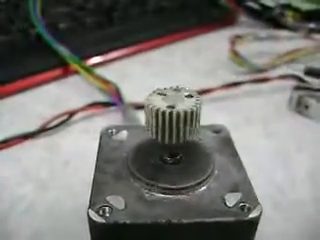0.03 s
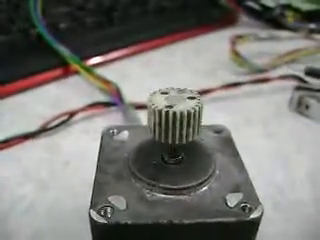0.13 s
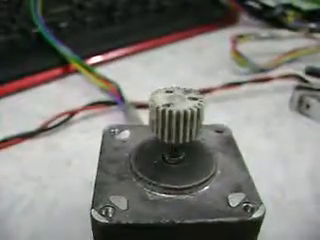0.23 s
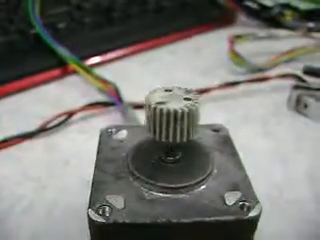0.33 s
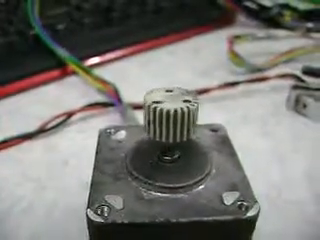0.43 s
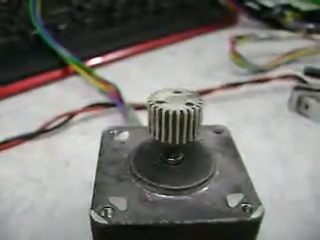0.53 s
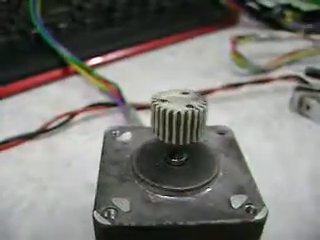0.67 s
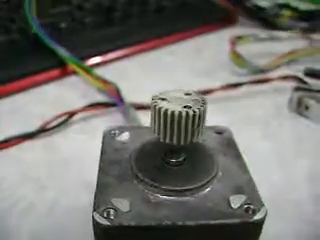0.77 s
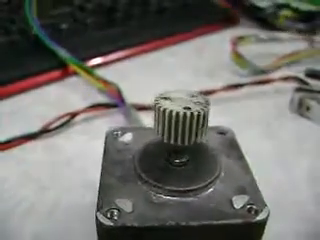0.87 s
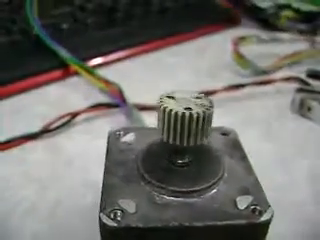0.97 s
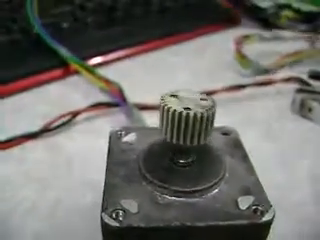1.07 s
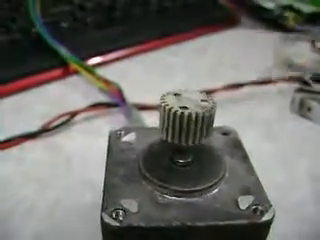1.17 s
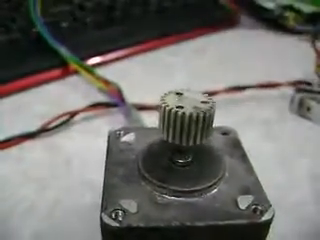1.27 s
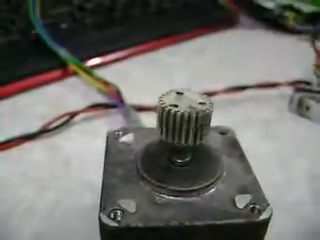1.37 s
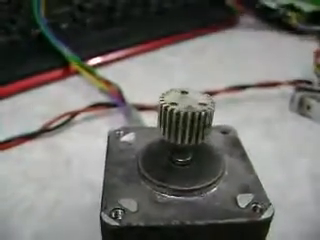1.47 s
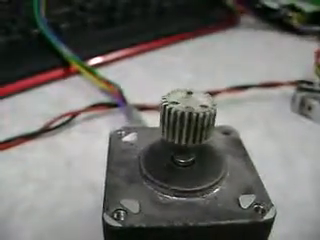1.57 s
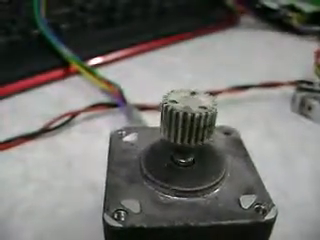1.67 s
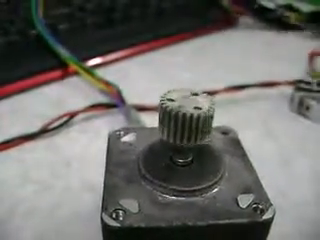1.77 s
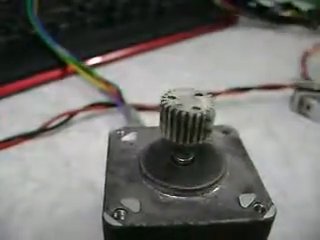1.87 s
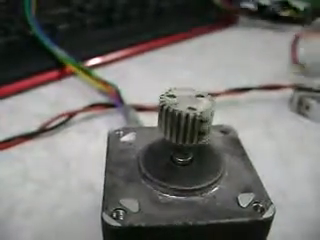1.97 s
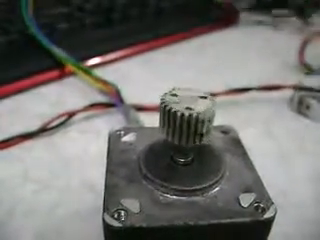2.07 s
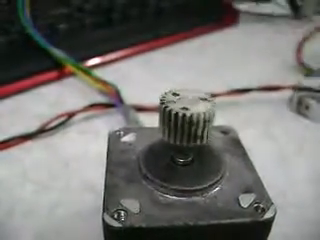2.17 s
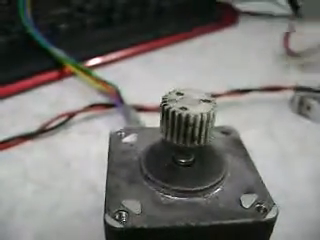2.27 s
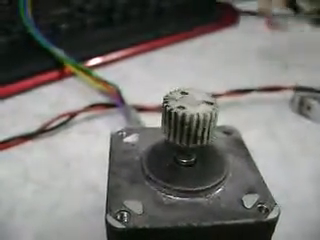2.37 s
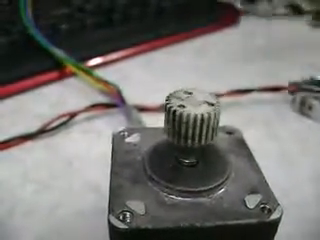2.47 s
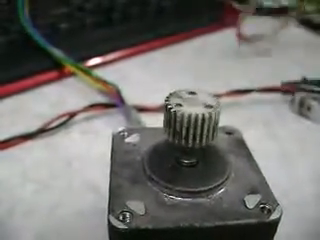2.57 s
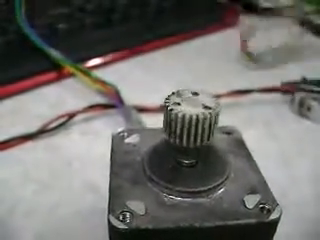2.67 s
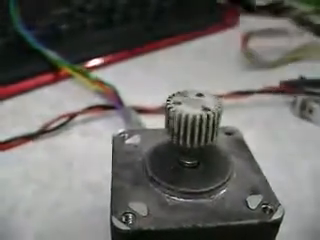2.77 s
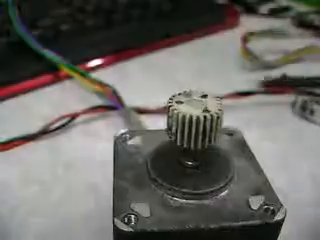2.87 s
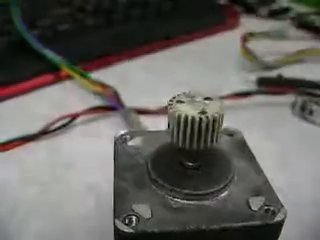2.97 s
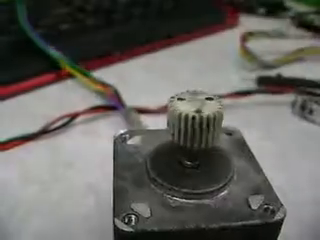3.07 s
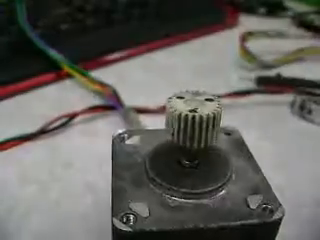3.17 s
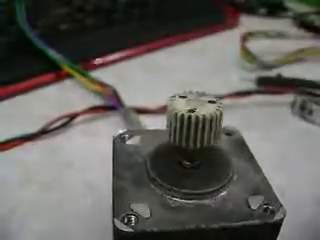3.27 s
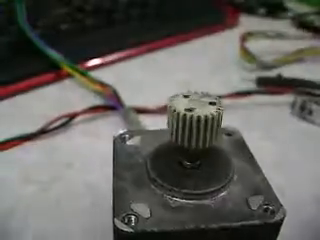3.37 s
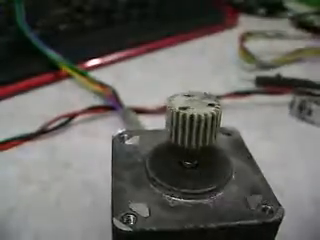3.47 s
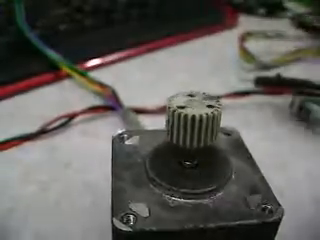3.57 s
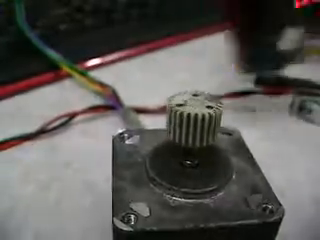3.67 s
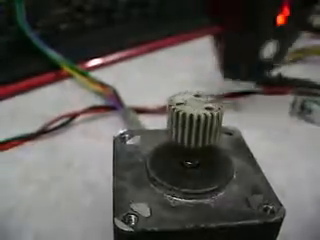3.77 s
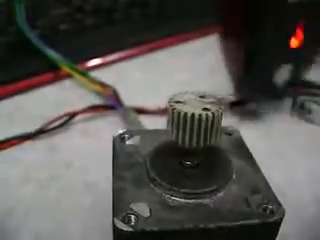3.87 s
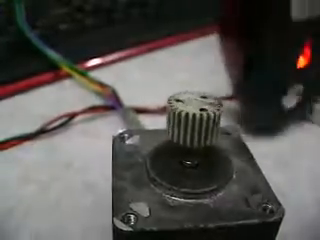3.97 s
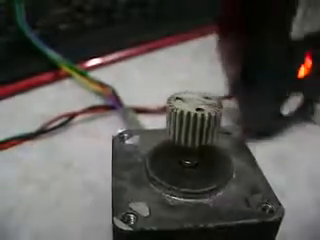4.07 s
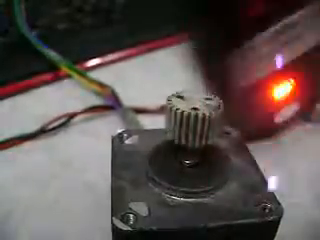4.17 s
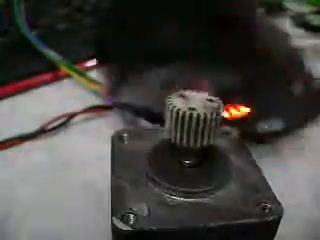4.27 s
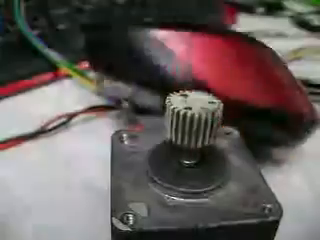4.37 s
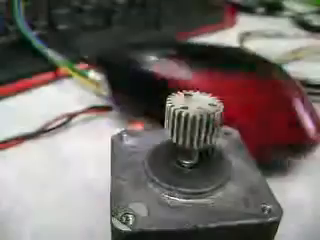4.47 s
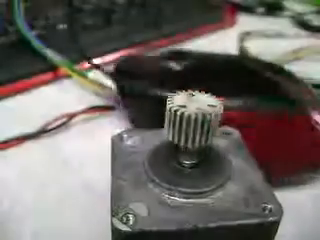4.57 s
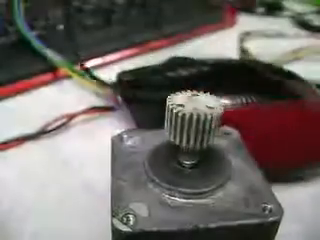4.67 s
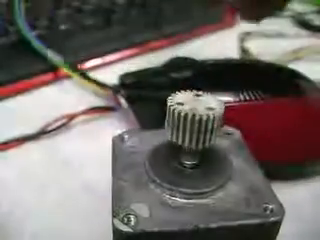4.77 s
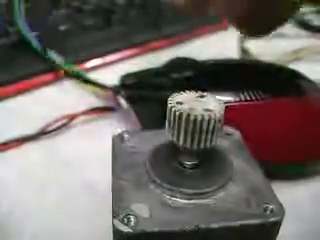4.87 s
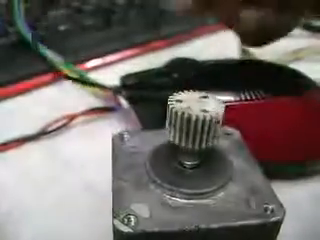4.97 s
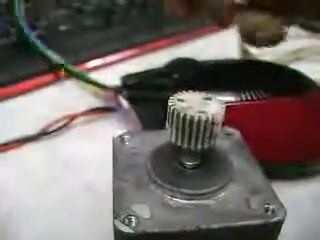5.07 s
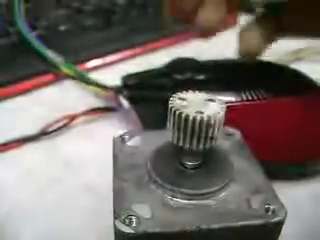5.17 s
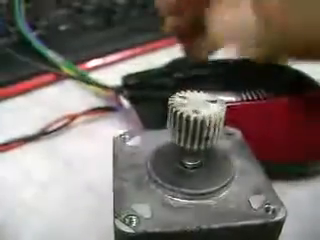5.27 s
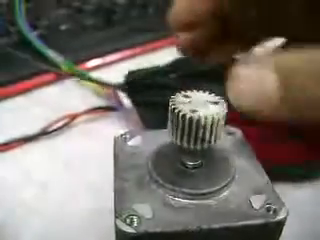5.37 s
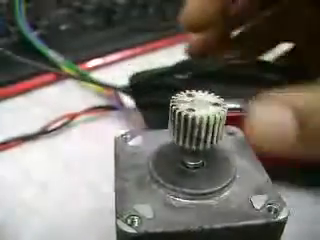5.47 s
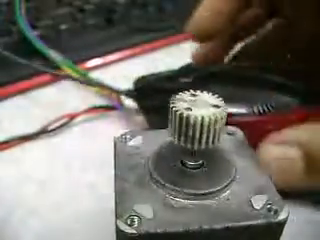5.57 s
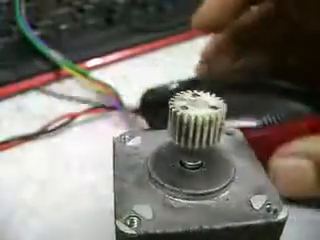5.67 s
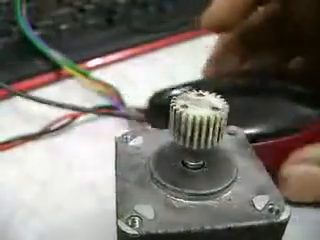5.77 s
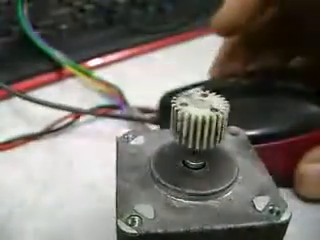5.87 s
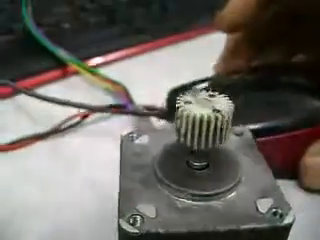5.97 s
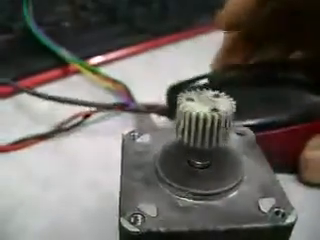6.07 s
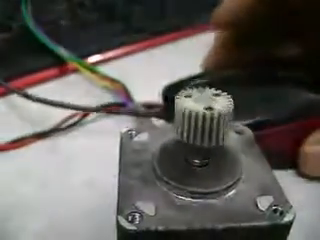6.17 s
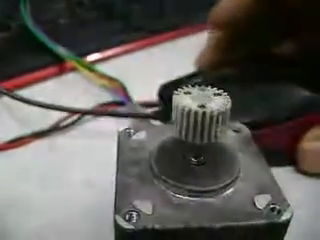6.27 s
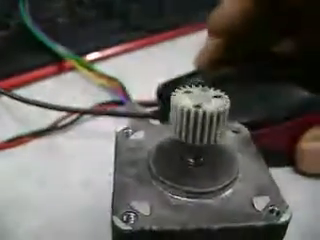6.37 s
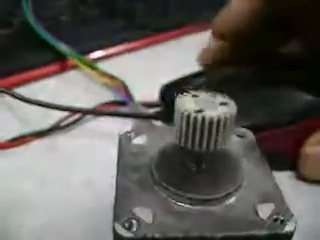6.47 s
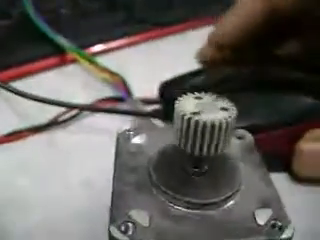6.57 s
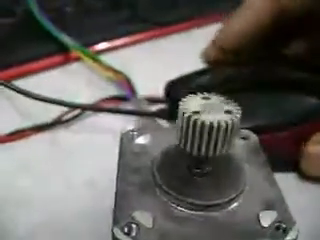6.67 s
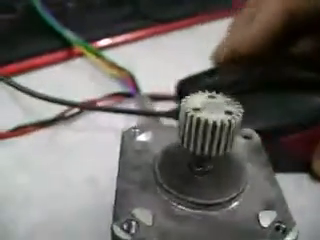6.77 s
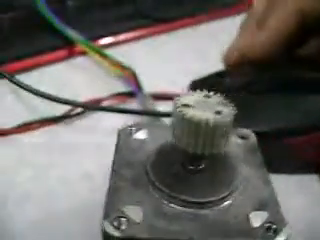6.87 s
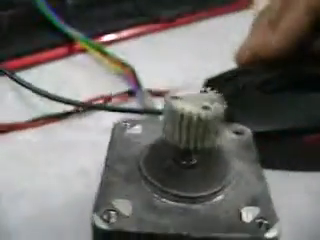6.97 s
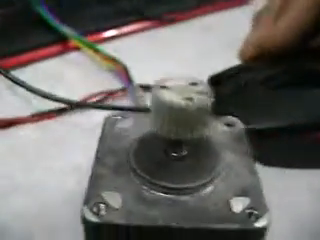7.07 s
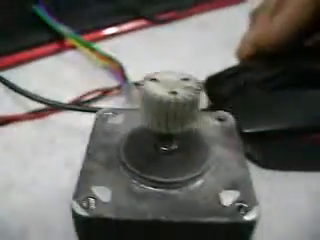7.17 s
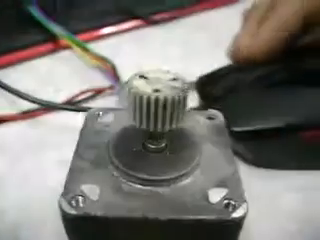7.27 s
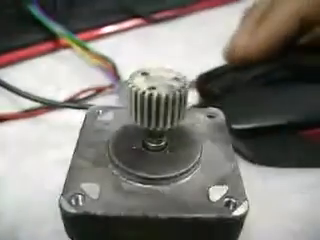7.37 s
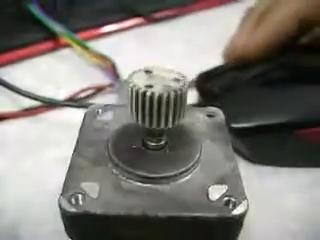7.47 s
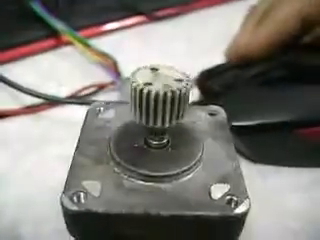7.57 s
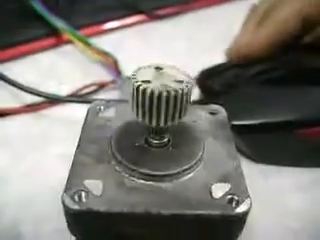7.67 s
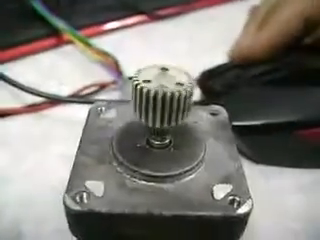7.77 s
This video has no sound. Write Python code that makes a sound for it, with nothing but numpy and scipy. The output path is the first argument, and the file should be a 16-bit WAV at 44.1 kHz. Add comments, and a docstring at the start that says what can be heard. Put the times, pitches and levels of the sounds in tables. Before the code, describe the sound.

Close on a desktop, an even fan noise drones throughout. Things are pushed with short scrapes, plastic connectors tumble in sharp irregular clicks, and a mouse is knocked and set down hard. Soft sliding, a few faint ticks and two short squeaks follow before only gentle rubbing and hiss remain. The sound is band-limited, with clipped peaks and slight room ring.

```python
"""A steady fan rush with hiss, soon joined by scrapes and dull rubs of things pushed over a desk.
Plastic plugs clatter and shake loose leads; a computer mouse is knocked, set down and slid, squeaking faintly.
Blows are cracks, pings and ringing modes; slides and fan are shaped noise; the squeak is gliding tones.
A close, narrow-band microphone clips whatever exceeds its limits."""
import sys
import numpy as np
from scipy import signal
from scipy.fft import rfft, irfft, next_fast_len
from scipy.io import wavfile

SR = 44100
rng = np.random.default_rng(int(sys.argv[2]) if len(sys.argv) > 2 else 0)


def waveform_to_disk(signal):
    """Save audio, clipped to [-1, 1], as 16-bit WAV at the path in sys.argv[1]."""
    frames = np.transpose(np.atleast_2d(signal))
    scaled = np.clip(frames, -1, 1) * 32767
    samples = np.round(scaled).astype(np.int16)
    wavfile.write(sys.argv[1], SR, samples)


N = 344914
TIME_S = np.arange(N) / SR

# plug blows, relative levels: (time [s], struck part pitch [Hz], edge crack [dB], shell knock [dB], desk thud [dB])
PLUG_BLOWS = [(2.3254, 1240, -5, -22.5, -29), (2.3529, 1430, -12, -10, -30), (2.4127, 1150, -7, -18.5, -32),
              (2.497, 3400, -3, -26, -14), (2.504, 1070, -29, -23, -15.5), (2.5165, 2620, -9.5, -46, -36),
              (2.5399, 1710, -10.5, -38, -39), (2.5682, 2600, 0.5, -18.5, -21),
              (2.5932, 2700, -12.5, -35, -33), (2.6271, 1480, -12, -16.5, -49),
              (2.6351, 2150, -3, -20.5, -44), (2.657, 3220, -9.5, -52, -45), (2.683, 970, -11, -7, -13.5),
              (2.7035, 2110, -9, -33, -23.5), (2.7282, 980, -9.5, -21.5, -29), (2.736, 2230, -16, -40, -25),
              (2.8363, 1500, -12.5, -31, -40), (2.85, 1810, -12, -31, -50.5), (2.939, 1000, -25, -27, -40),
              (3.034, 5020, -14.5, -36, -44)]
# mouse on desk, relative levels: (time [s], struck part pitch [Hz], edge crack [dB], shell knock [dB], desk thud [dB])
MOUSE_BLOWS = [(3.9425, 1380, -15, -45, -42), (4.0528, 1150, -0.5, -19, -33),
               (4.0565, 1000, -18, -12.5, -26), (4.0835, 970, -16, -19.5, -26),
               (4.1096, 1020, -20, -21, -30), (4.4617, 920, 4.5, -6.5, -16.5),
               (4.4725, 1080, -11, -16, -34), (4.4803, 940, -11, -16.5, -24), (4.4905, 980, -26, -26, -24),
               (4.5742, 1880, -1.3, -20, -28), (4.675, 1190, -21, -33, -49), (5.941, 1050, -15, -24.5, -50),
               (5.951, 1080, -29, -33, -47), (6.07, 1410, -28, -33, -43), (6.226, 1860, -17, -34, -62)]
# body modes of plug on desk top: (frequency [Hz], relative level [dB], t60 [s])
PLUG_BODY_MODES = [(60, -13.5, 0.006), (330, -4.5, 0.029), (508, -3, 0.14), (895, 1, 0.015),
                   (1083, -1.5, 0.041), (1500, 2, 0.0076), (1900, -2, 0.009), (2500, 2, 0.0054),
                   (3080, -2.5, 0.0042), (3700, -10.5, 0.014), (4420, -2.5, 0.011), (4900, -4, 0.005),
                   (6100, 0.5, 0.0053)]
# body modes of mouse on desk top: (frequency [Hz], relative level [dB], t60 [s])
MOUSE_BODY_MODES = [(45, 2.5, 0.0047), (169, -16, 0.014), (234, -7.5, 0.024), (390, 4.5, 0.024),
                    (462, -0.5, 0.064), (631, -2.5, 0.12), (760, -9.5, 0.016), (973, 4.5, 0.01),
                    (1089, -0.5, 0.02), (1570, -10, 0.0043), (1900, -17.5, 0.013), (2510, -27, 0.002),
                    (3700, -6, 0.01), (4680, -6.5, 0.0042), (6100, -2.5, 0.016)]
# hollow desk boom under the first mouse knocks: (peak time [s], rise [s], fall [s], level [dB])
DESK_BOOM = (4.135, .075, .05, -36)
# things pushed over the desk: (time of top speed [s], rise [s], fall [s], scrape level [dB], dull rub level [dB])
PUSHES = [(.575, .04, 0.042, -38.5, -31), (.655, 0.019, 0.028, -30, -32), (2.13, 0.13, 0.33, -38.5, -46.5),
          (2.53, 0.092, 0.14, -45, -32.5), (2.69, 0.032, 0.1, -29.5, -34), (2.88, 0.068, 0.63, -39, -43),
          (3.97, 0.11, 0.17, -42.5, -35), (4.62, 0.024, 0.16, -37, -33.5), (5.6, 0.38, 0.43, -42.5, -37.5),
          (6.05, 0.081, .04, -39.5, -39.5), (6.24, 0.041, 0.44, -42, -41.5), (6.95, 0.12, 0.13, -37, -50),
          (7.3, 0.27, 0.51, -49, -40)]
# scrape spectrum: (frequency [Hz], relative density [dB per Hz])
SCRAPE_SPECTRUM = [(100, -26.5), (400, -16), (700, 0), (1100, 4), (1500, -5), (2200, -7.5), (3200, -10.5),
                   (5200, -14.5)]
# soft, dull rub spectrum: (frequency [Hz], relative density [dB per Hz])
RUB_SPECTRUM = [(40, -30), (200, -5), (450, -3), (650, 0), (950, -6.5), (1400, -21.5), (4000, -37.5)]
# mouse foot squeaks: (peak time [s], rise [s], fall [s], pitch at peak [Hz], glide [Hz per s], relative level [dB])
SQUEAK_GLIDES = [(6.838, .012, .08, 1560, -3000, -34), (6.953, .022, .022, 1330, 4800, -26.5)]
# fan and microphone hiss spectrum: (frequency [Hz], relative density [dB per Hz])
FAN_SPECTRUM = [(25, -15), (48, -17.5), (90, -11.5), (200, -6.5), (370, 1.5), (510, -3), (740, 0),
                (1000, -5), (1300, -6.5), (1640, -13), (1850, -9), (2500, -15), (2950, -19), (5200, -22.5)]
# droning fan resonances: (frequency [Hz], width [Hz], level [dB])
FAN_DRONES = [(173.7, 7.1, -52), (236.4, 7.6, -48.5), (361, 59, -48.5), (842, 170, -41.5)]

ROOM_T60_S, REFLECTION_RISE_S = 0.4, 0.0017
RATTLE_TAPS_PER_S, RATTLE_DB, RATTLE_T60_S = 370, -13.5, 0.3  # RATTLE_DB: re the crack
FAN_DB, FAN_WANDER_DB = -33, 0.62
MIC_LIMIT, CEILING = 0.88, 0.63  # amplitude
MIC_EDGE_HZ, MIC_STEEP_EDGE_HZ, CUTOFF_HZ = 5337, 6750, 16000


def from_db(db):
    """Decibels to amplitude gain."""
    return 10 ** (np.asarray(db) / 20)


def rms_one(x):
    """Scale to rms 1."""
    return x / np.sqrt(np.mean(x ** 2) + 1e-20)


def unit_energy(x):
    """Scale to energy 1."""
    return x / np.sqrt(np.sum(x ** 2) + 1e-20)


def coloured_noise(spectrum):
    """Noise shaped by a spectrum, flat beyond its ends; rms 1."""
    hz, db = np.transpose(spectrum)
    size = next_fast_len(N)
    grid_hz = np.maximum(np.fft.rfftfreq(size, 1 / SR), 1)
    gain = from_db(np.interp(np.log(grid_hz), np.log(hz), db))
    return rms_one(irfft(rfft(rng.standard_normal(size)) * gain, size)[:N])


def drift(cutoff_hz):
    """Low-passed random fluctuation; rms 1."""
    lowpass = signal.butter(2, cutoff_hz, fs=SR, output="sos")
    slow = signal.sosfilt(lowpass, rng.standard_normal(N + SR))
    return rms_one(slow[SR:])  # drop the filter's start-up


def swell(peak_s, rise_s, fall_s):
    """Speed of a movement: Gaussian rise and fall, height 1."""
    side_s = np.where(TIME_S < peak_s, rise_s, fall_s)
    return np.exp(-np.minimum(((TIME_S - peak_s) / side_s) ** 2, 20))


def mode_width_hz(t60_s):
    """Resonance bandwidth that decays 60 dB in t60_s."""
    return np.log(1000) / (np.pi * t60_s)


def resonate(x, hz, width_hz):
    """Two-pole resonance, gain about 1 at its centre."""
    r = np.exp(-np.pi * width_hz / SR)
    numerator = np.array([1, 0, -1]) * (1 - r * r) / 2
    denominator = [1, -2 * r * np.cos(2 * np.pi * hz / SR), r * r]
    return signal.lfilter(numerator, denominator, x + 1e-18)


def ring_mode(t_s, hz, t60_s, sign, scatter_db, scatter_t60_s, room_db):
    """One body mode rings directly, through nearby scatter and in the room tail; energy 1."""
    width_hz = mode_width_hz(t60_s)
    arrived = np.clip(t_s / REFLECTION_RISE_S, 0, 1) ** 2
    near, far = rng.standard_normal((2, len(t_s))) * arrived
    direct = unit_energy(resonate(1. * (t_s == 0), hz, width_hz)) * sign
    scatter = unit_energy(resonate(near * from_db(-60 * t_s / scatter_t60_s), hz, width_hz))
    tail = unit_energy(resonate(far * from_db(-60 * t_s / ROOM_T60_S), hz, width_hz))
    return unit_energy(direct + from_db(scatter_db) * scatter + from_db(room_db) * tail)


def contacts(blows, modes, level_db, clack_db, tick_db, scatter_db, scatter_t60_s, room_db,
             crack_db, crack_hz, ping_db, ping_t60_s):
    """Each blow cracks, pings the struck part and rings the body; upper modes (clack, tick) follow the crack."""
    out = np.zeros(N + SR)
    t_s = np.arange(SR // 2) / SR
    band_hz = [400, 1000, 2100, 4300]  # thud, knock, clack, tick
    crack = np.sin(2 * np.pi * crack_hz * t_s) * np.exp(-t_s * crack_hz)  # hard edges: little over one cycle
    for time_s, part_hz, peak_db, knock_db, thud_db in blows:
        band_db = [thud_db, knock_db, peak_db + clack_db, peak_db + tick_db]
        ping = np.sin(2 * np.pi * part_hz * t_s) * from_db(ping_db - 60 * t_s / ping_t60_s)
        blow = from_db(peak_db) * (from_db(crack_db) * crack + ping)
        for k, (hz, mode_db, t60_s) in enumerate(modes):
            ring = ring_mode(t_s, hz, t60_s, (-1) ** k, scatter_db, scatter_t60_s, room_db)
            drive_db = np.interp(np.log(hz), np.log(band_hz), band_db)
            blow = blow + ring * from_db(level_db + mode_db + drive_db)
        start = round(time_s * SR)
        out[start:start + len(t_s)] += blow
    return out[:N]


def plug_clatter():
    """Plastic plugs strike with hard cracks and ringing shells."""
    return contacts(PLUG_BLOWS, PLUG_BODY_MODES, level_db=22.5, clack_db=-15.5, tick_db=-19.5,
                    scatter_db=-3.5, scatter_t60_s=0.056, room_db=-6.5,
                    crack_db=0, crack_hz=2700, ping_db=-7.5, ping_t60_s=0.015)


def mouse_knocks():
    """The mouse meets the desk; its upper body modes are driven less than the plugs'."""
    return contacts(MOUSE_BLOWS, MOUSE_BODY_MODES, level_db=23.0, clack_db=-28, tick_db=-22,
                    scatter_db=-2, scatter_t60_s=0.06, room_db=-10,
                    crack_db=1, crack_hz=2750, ping_db=-9.5, ping_t60_s=0.016)


def lead_rattle():
    """Plug blows shake the leads: random taps die away, each waking one upper plastic mode."""
    decays = [(TIME_S > time_s) * from_db(crack_db - 60 * np.abs(TIME_S - time_s) / RATTLE_T60_S)
              for time_s, _, crack_db, *_ in PLUG_BLOWS]
    shaken = np.max(decays, axis=0)
    modes = [mode for mode in PLUG_BODY_MODES if mode[0] > 800]
    tapped = rng.random(N) < RATTLE_TAPS_PER_S / SR
    taps = tapped * rng.uniform(-1.1, 1, N) * from_db(RATTLE_DB) * shaken
    mode_of_tap = rng.integers(0, len(modes), N)
    out = np.zeros(N)
    for k, (hz, _, t60_s) in enumerate(modes):
        width_hz = mode_width_hz(t60_s)
        unit_height = SR / (2 * np.pi * width_hz)  # a unit tap rings with height about 1
        out += resonate(taps * (mode_of_tap == k), hz, width_hz) * unit_height
    return out


def desk_boom(hz):
    """The desk top swings at its lowest note."""
    peak_s, rise_s, fall_s, db = DESK_BOOM
    return from_db(db) * swell(peak_s, rise_s, fall_s) * np.sin(2 * np.pi * hz * TIME_S)


def sliding(grain_db):
    """Pushes scrape with a fine, uneven grain and stir the desk's low and middle notes."""
    scrape_gain, rub_gain = 0, 0
    for peak_s, rise_s, fall_s, scrape_db, rub_db in PUSHES:
        speed = swell(peak_s, rise_s, fall_s)
        scrape_gain = scrape_gain + from_db(scrape_db) * speed
        rub_gain = rub_gain + from_db(rub_db) * speed
    grain = from_db(grain_db * drift(170))
    scrape = scrape_gain * grain * coloured_noise(SCRAPE_SPECTRUM)
    return scrape + rub_gain * coloured_noise(RUB_SPECTRUM)


def squeak(rough_db, overtone_db, scrape_db, scrape_hz):
    """The mouse foot sticks and slips in short, unsteady glides with a bright scrape."""
    unsteady = 1 + 0.018 * drift(200)  # pitch factor
    highpass = signal.butter(2, scrape_hz, "high", fs=SR, output="sos")
    scrape = rms_one(signal.sosfilt(highpass, rng.standard_normal(N)))
    out = 0
    for peak_s, rise_s, fall_s, hz, glide_hz_per_s, db in SQUEAK_GLIDES:
        pitch_hz = (hz + glide_hz_per_s * (TIME_S - peak_s)) * unsteady
        phase = 2 * np.pi * np.cumsum(pitch_hz) / SR
        tones = np.sin(phase) + from_db(overtone_db) * np.sin(2 * phase)
        slips = tones + from_db(scrape_db) * scrape
        out = out + from_db(db) * swell(peak_s, rise_s, fall_s) * slips
    return out * from_db(rough_db * drift(90))


def fan():
    """Even rush of air and hiss, plus narrow noise bands droning at fan resonances."""
    out = coloured_noise(FAN_SPECTRUM) * from_db(FAN_DB + FAN_WANDER_DB * drift(9))
    for hz, width_hz, db in FAN_DRONES:
        out = out + from_db(db) * rms_one(resonate(rng.standard_normal(N), hz, width_hz))
    return out


def scene():
    """Sum of all sources at the one microphone."""
    blows = plug_clatter() + lead_rattle() + mouse_knocks() + desk_boom(hz=72)
    friction = sliding(grain_db=4.5) + squeak(rough_db=4.5, overtone_db=-22, scrape_db=-11, scrape_hz=2800)
    return (blows + friction + fan())[None]


def record(dry):
    """Microphone saturates, passes a narrow band; overshoot clips again and splashes treble above it."""
    saturated = np.clip(dry, -MIC_LIMIT, MIC_LIMIT)
    narrow = signal.sosfilt(signal.butter(11, MIC_EDGE_HZ, fs=SR, output="sos"), saturated)
    narrow = signal.sosfilt(signal.ellip(8, 0.1, 60, MIC_STEEP_EDGE_HZ, fs=SR, output="sos"), narrow)
    clipped = np.clip(narrow, -CEILING, CEILING)
    return signal.sosfilt(signal.ellip(10, 0.1, 80, CUTOFF_HZ, fs=SR, output="sos"), clipped)


dry = scene()
out = record(dry)
waveform_to_disk(out)
```